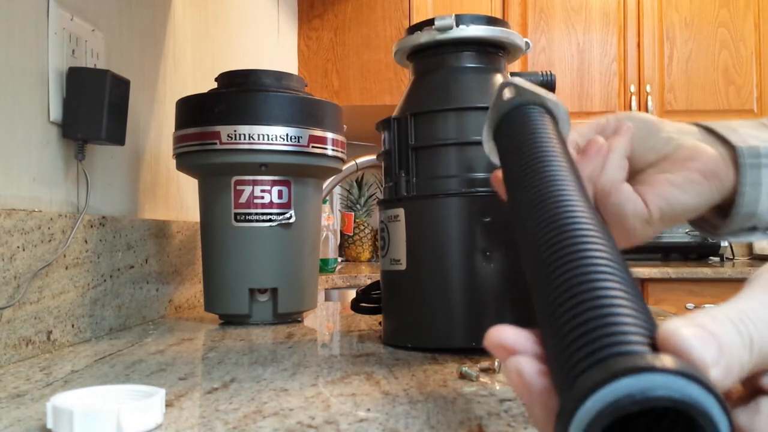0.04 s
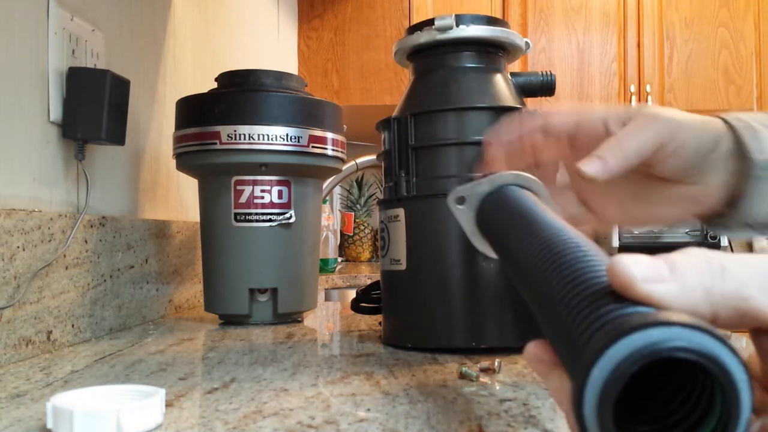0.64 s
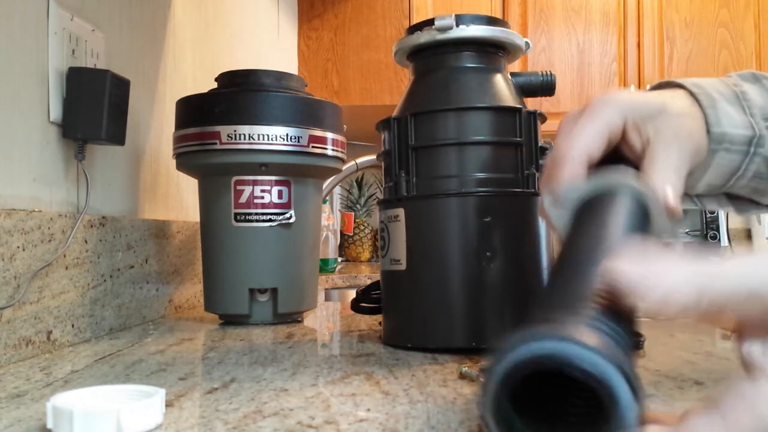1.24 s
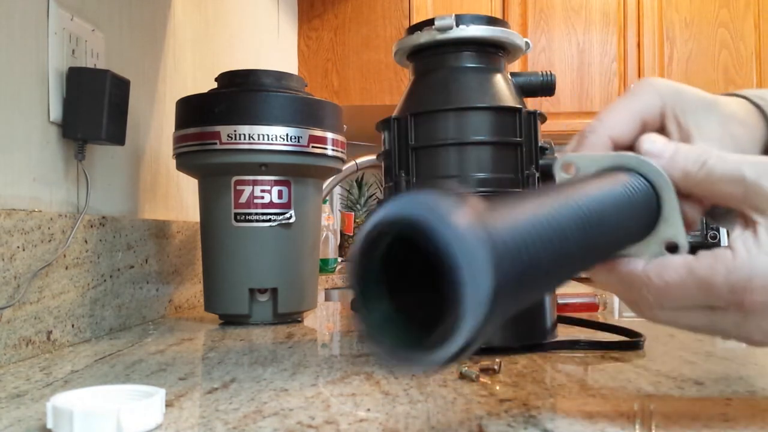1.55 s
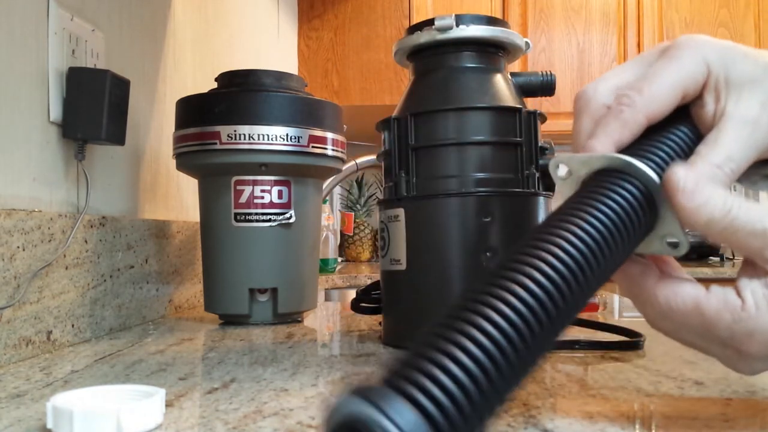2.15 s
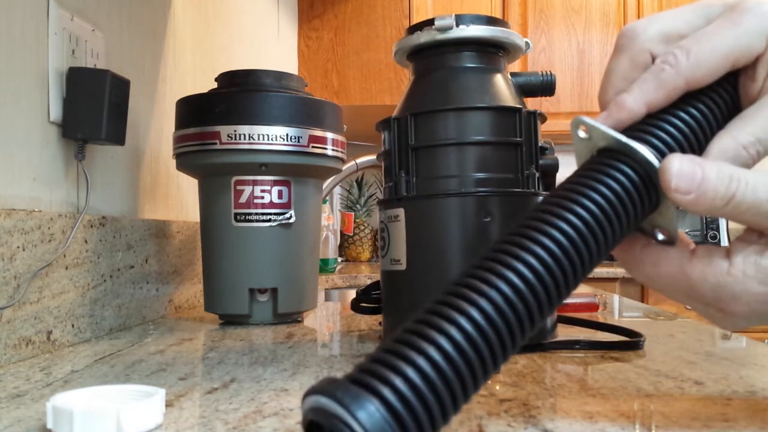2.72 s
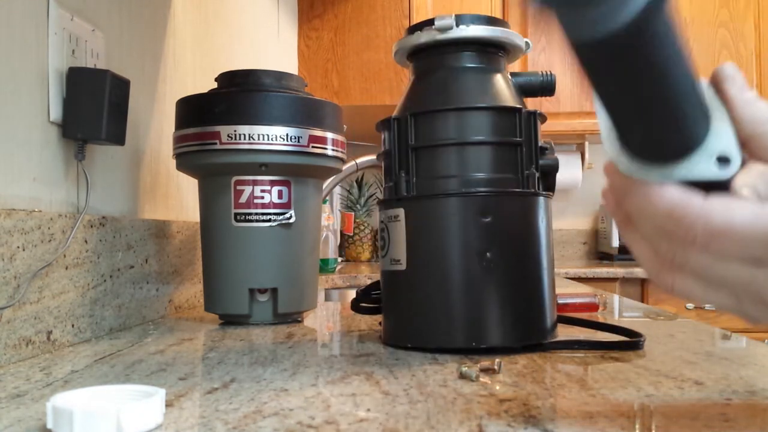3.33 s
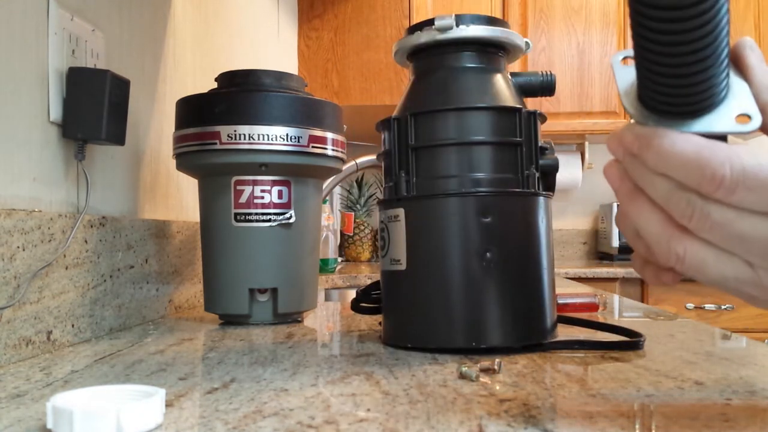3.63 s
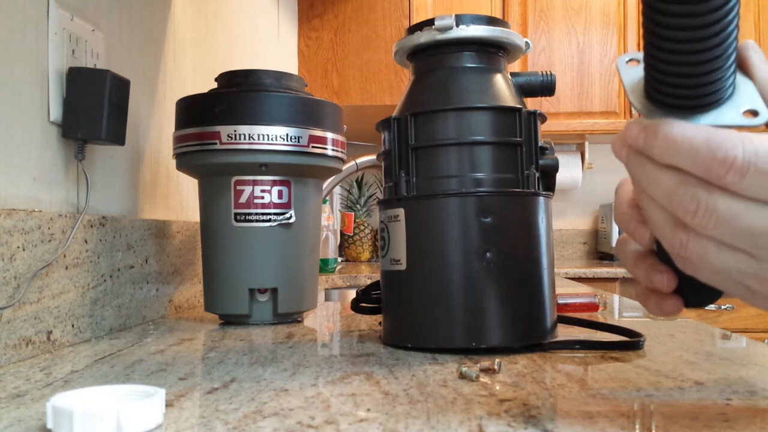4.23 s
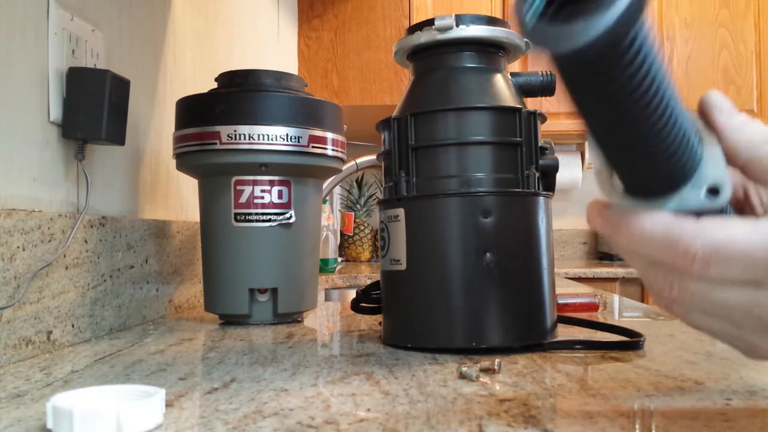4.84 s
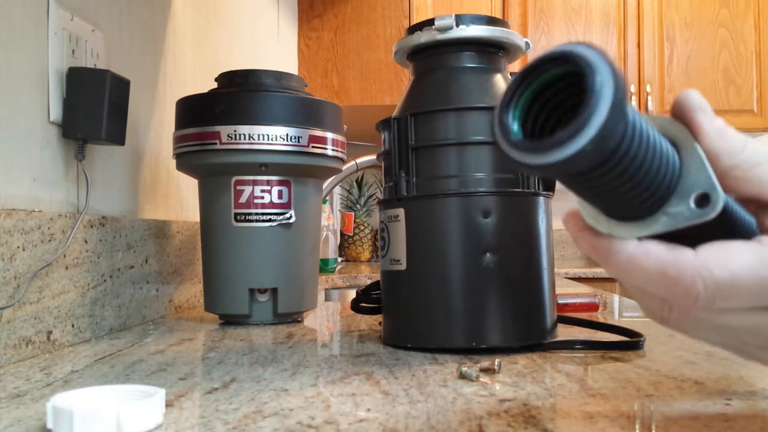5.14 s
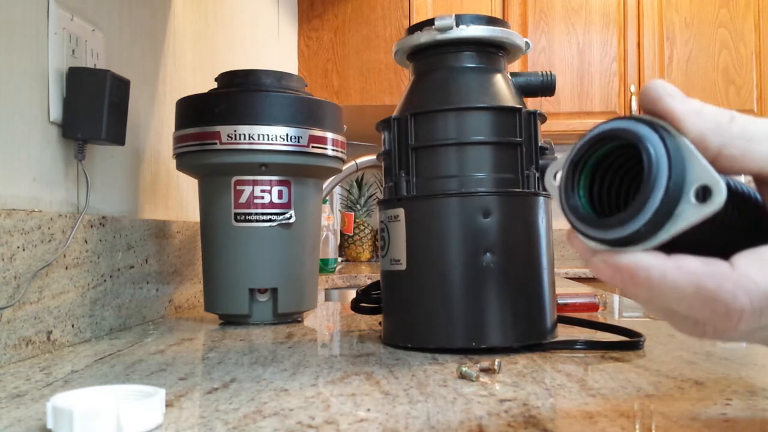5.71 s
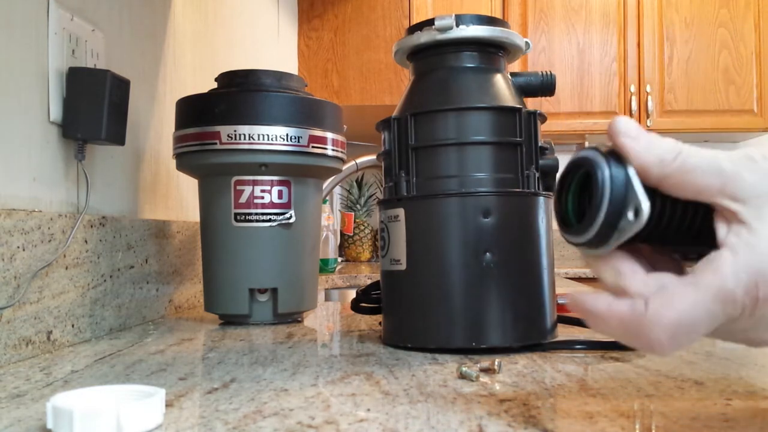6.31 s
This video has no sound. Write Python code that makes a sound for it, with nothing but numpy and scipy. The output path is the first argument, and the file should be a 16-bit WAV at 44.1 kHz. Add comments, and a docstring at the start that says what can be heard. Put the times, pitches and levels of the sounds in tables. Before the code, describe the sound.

Close, zipping runs of plastic clicks and a hollow tube tone as a corrugated hose is worked through a metal ring.

```python
"""A corrugated plastic drain hose ratchets through a metal flange, over a kitchen counter.
Each rib snaps past the flange: the wall cracks and thuds, the air inside rings with a hollow note.
Between pulls, fingers tap and rub the plastic and a palm cups the open end.
A small kitchen reverberates over a faint appliance hum."""
import sys
import numpy as np
from scipy import signal
from scipy.fft import rfft, irfft, next_fast_len
from scipy.io import wavfile
from scipy.ndimage import map_coordinates

SR = 44100
rng = np.random.default_rng(int(sys.argv[2]) if len(sys.argv) > 2 else 0)


def dump_mix(stems):
    """Bounce the given channels to the path in sys.argv[1] as a 16-bit WAV at rate SR."""
    frames = np.atleast_2d(stems).T  # one column per channel
    limited = np.clip(frames, -1, 1)  # hard clip at full scale
    pcm = np.round(limited * 32767).astype(np.int16)
    wavfile.write(sys.argv[1], SR, pcm)


N = 289737
TIME_S = np.arange(N) / SR

# ribs passing the flange: start_s, peak_db, jolt_db
RIB_SNAPS = [(0.1, -20, -35), (0.1436, -17.5, -29), (0.1627, -14, -35.5), (0.183, -16.5, -34.5),
             (0.195, -13.5, -26), (0.2036, -10.5, -50), (0.415, -16, -35), (0.4384, -22, -36.5),
             (0.9551, -17.5, -38.5), (0.9865, -18.5, -31), (1.021, -19, -44), (1.0275, -14, -28.5),
             (1.048, -11, -25.5), (1.0835, -9, -26), (1.1272, -21, -40), (3.18, -16.5, -35),
             (3.2021, -15.5, -37), (3.2135, -22, -34.5), (3.236, -19, -34), (3.25, -13.5, -31.5),
             (3.2645, -17, -36), (3.2812, -11, -32.5), (3.3059, -24, -37), (3.3303, -13, -31),
             (3.3679, -13.5, -32), (3.3906, -16.5, -37), (3.413, -18.5, -31), (3.462, -11.5, -32.5),
             (3.4723, -29, -35), (3.5125, -19, -31.5), (3.5316, -18, -36.5), (5.033, -19, -36),
             (5.0729, -8.5, -28), (5.1027, -9.5, -30.5), (5.1224, -8.5, -28.5), (5.1304, -9.5, -22.5),
             (5.1539, -17.5, -25.5), (5.168, -5, -23.5), (5.1875, -11, -26), (5.2016, -7.5, -29),
             (5.2268, -9, -21.5), (5.2439, -17, -27), (5.2582, -10.5, -35), (5.2969, -8.5, -24.5),
             (5.3058, -9, -33.5), (5.3215, -5.5, -26), (5.3409, -11, -34.5), (5.3568, -5, -25),
             (5.3731, -6.5, -34), (5.3905, -4.5, -35.5), (5.4026, -7, -30), (5.4235, -7.5, -35),
             (5.4342, -4.5, -39.5), (5.4529, -7, -30)]
# fingers and loose flange: start_s, peak_db, jolt_db, note_db
LIGHT_TAPS = [(1.289, -29, -47.5, -54), (1.6088, -44, -58.5, -46.5), (1.6372, -43, -59.5, -39.5),
              (1.784, -44, -70, -76), (1.8634, -34.5, -48, -36.5), (1.9073, -41, -58, -67),
              (2.0015, -48, -61.5, -51), (2.4525, -59, -61.5, -60), (2.496, -31, -48.5, -61),
              (2.8811, -51, -53.5, -68), (2.9086, -32, -48.5, -36.5), (3.145, -30, -43.5, -36),
              (3.7927, -40, -57.5, -49), (3.902, -45.5, -61, -52.5), (4.5284, -53, -64, -52),
              (4.9718, -39.5, -52, -41), (5.011, -29.5, -45, -41), (6.0103, -45.5, -67.5, -69)]
# grip per pull: start_s, end_s, crack_db, sparkle_db, thump_db, thud_db, free_ring_db, drag_db
PULL_GRIPS = [(0.09, 0.25, -1.5, 0, -8, -2.5, -4, -26), (0.41, 0.43, 1.5, 3.5, -5.5, 3.5, -4, -42),
              (0.94, 1.148, 1, 4.5, -12.5, -8.5, -4.5, -26.5), (3.17, 3.421, 2.5, 1, -15, -1, 4, -38.5),
              (3.45, 3.56, 4.5, 0, -5.5, 2.5, -0.5, -38.5), (5.02, 5.26, 0, -0.5, -28, -1.5, -7, -33),
              (5.29, 5.47, -0.5, -1, -13.5, -2, -19, -33.5)]


def from_db(db):
    return 10 ** (np.asarray(db) / 20)


def unit_energy(x):
    return x / np.sqrt(np.sum(x ** 2, axis=-1, keepdims=True) + 1e-20)


def decay(t, t60_s):
    return np.exp(-np.log(1000) * t / t60_s)


def swell(centre_s, sigma_s):
    return np.exp(-((TIME_S - centre_s) / sigma_s) ** 2 / 2)


def add(track, start_s, sound):
    i = max(int(round(start_s * SR)), 0)
    track[..., i:i + sound.shape[-1]] += sound[..., :N - i]


def at_hz(points, hz):
    """Table lookup on a log-frequency axis."""
    freq_hz, value = np.transpose(points)
    return np.interp(np.log(np.maximum(hz, 1)), np.log(freq_hz), value)


def coloured(x, spectrum, size=4096):
    """Unit-energy minimum-phase filter, falling away past both ends of the spectrum."""
    (low_hz, low_db), (high_hz, high_db) = spectrum[0], spectrum[-1]
    closed = [(low_hz / 2, low_db - 30), *spectrum, (high_hz * 2, high_db - 30)]
    gain = from_db(at_hz(closed, np.fft.rfftfreq(size, 1 / SR)))
    cepstrum = irfft(np.log(gain))
    cepstrum[1:size // 2] *= 2
    cepstrum[size // 2 + 1:] = 0
    impulse = unit_energy(irfft(np.exp(rfft(cepstrum))))
    return signal.oaconvolve(x, impulse[None], axes=1)[:, :N]


def stereo_noise(corr, size):
    """White noise with left-right correlation corr."""
    mid, side = rng.standard_normal((2, size))
    return np.sqrt((1 + corr) / 2) * mid + np.sqrt((1 - corr) / 2) * side * np.array([[1], [-1]])


def waver(rate_hz):
    """Smooth random wander, spread about 1."""
    steps = rng.standard_normal(N // 100)
    return map_coordinates(steps, [TIME_S * rate_hz], order=3, mode="mirror")


def background(air_db=-62):
    """Still room air and appliance hum."""
    # room air: freq_hz, gain_db
    air_spectrum = [(15, -56.5), (25, -26.5), (49, -4.5), (71, -9.5), (81, -19), (100, -6), (166, -5),
                    (314, -7), (340, -6), (455, -5.5), (563, -17), (735, -17.5), (2310, -27), (2640, -25.5),
                    (14500, -30)]
    # hum: pitch_hz, level_db
    hum_tones = [(167.7, -70), (480, -72.5), (62.3, -72)]
    hum = sum(from_db(db) * np.sin(2 * np.pi * (hz * TIME_S + rng.random())) for hz, db in hum_tones)
    return from_db(air_db) * coloured(stereo_noise(0.14, N), air_spectrum) + hum


def kitchen(build_s, bass_hz):
    """Impulse response of counter and cupboards: dies band by band, bass alike on both sides."""
    # reverberation: freq_hz, t60_s
    band_decay = [(150, 0.44), (500, 0.31), (1500, 0.35), (4000, 0.33), (8000, 0.36), (14000, 0.22)]
    # reflections: freq_hz, gain_db
    band_gain = [(150, 0.5), (500, 1.5), (1500, 2.5), (4000, -1.5), (8000, -3), (14000, -0.5)]
    t, tail = TIME_S[:int(.7 * SR)], 0
    edges_hz = np.geomspace(60, 16000, 9)
    for low, high in zip(edges_hz, edges_hz[1:]):
        hz = np.sqrt(low * high)
        band = signal.butter(3, [low, high], "band", fs=SR, output="sos")
        corr = 1 / (1 + (hz / bass_hz) ** 2)
        noise = from_db(at_hz(band_gain, hz)) * stereo_noise(corr, len(t))
        tail = tail + signal.sosfilt(band, noise) * decay(t, at_hz(band_decay, hz))
    return unit_energy(tail * (1 - np.exp(-(t / build_s) ** 2)))


def microphone_ports(x):
    """Two ports colour left and right oppositely."""
    # port balance: freq_hz, left_minus_right_db
    balance = [(80, -5), (200, 0.5), (400, 0), (800, -3.5), (1400, 4), (2800, .5), (3800, -2), (5300, 4.5),
               (6800, -2.5), (8500, -5), (11000, -11), (14000, -7.5)]
    size = next_fast_len(2 * N)
    half_db = at_hz(balance, np.fft.rfftfreq(size, 1 / SR)) / 2
    return irfft(rfft(x, size) * from_db([half_db, -half_db]), size)[:, :N]


def friction(strokes, spectrum, grain_db, grain_hz, corr):
    """Sliding contact: tiny uneven slips swell and fade with each stroke."""
    envelope = sum(from_db(db) * swell(centre_s, sigma_s) for centre_s, sigma_s, db in strokes)
    sizes = from_db(grain_db * np.clip(rng.standard_normal(N // 4), -2, 2))
    sizes /= np.sqrt(np.mean(sizes ** 2))
    grain = np.interp(TIME_S * grain_hz, np.arange(len(sizes)), sizes)
    return coloured(stereo_noise(corr, N) * grain * envelope, spectrum)


def finger_rubs():
    """Skin slides on the hose."""
    # rubs: centre_s, sigma_s, level_db
    strokes = [(0.0, 0.032, -48), (0.49, 0.066, -54.5), (0.592, 0.0066, -49), (0.80, 0.023, -59),
               (0.945, 0.032, -51.5), (1.17, .035, -56), (1.28, 0.022, -51), (2.53, 0.041, -65.5),
               (2.88, 0.024, -59.5), (5.42, 0.024, -27.5), (6.02, 0.052, -62), (6.265, 0.031, -54.5),
               (6.33, 0.056, -58)]
    # skin friction: freq_hz, gain_db
    spectrum = [(150, 2.5), (480, 9.5), (900, -2.5), (2000, -4.5), (3500, -0.5), (7000, 1.5), (10000, -6),
                (14500, -13.5)]
    return friction(strokes, spectrum, grain_db=2.5, grain_hz=530, corr=0.14)


def bursts(times_s, levels_db, spectrum, t60_s, corr, spike, rattle_db, rattle_t60_s):
    """A faint hiss leads into each click: a spike, a scatter along the ribs, then a weak rattle."""
    out, onset = np.zeros((2, N)), SR // 100
    t = TIME_S[:SR // 10] - onset / SR
    lead_in = from_db(-22) * decay(abs(t), t60_s=0.081)
    release = decay(abs(t), t60_s) + from_db(rattle_db) * decay(abs(t), rattle_t60_s)
    envelope = np.where(t < 0, lead_in, release)
    for start_s, db in zip(times_s, levels_db):
        burst = unit_energy(stereo_noise(corr, len(t)) * envelope)
        lag = int(round(rng.normal(0, 4)))   # each spot has its own path to each side
        burst[[0, 1], [onset, onset + lag]] += spike
        add(out, start_s + t[0], from_db(db) * unit_energy(burst) * np.linalg.norm(envelope))
    return coloured(out, spectrum)


def snaps(times_s, peak_db, jolt_db, crack_db, tick_db, sparkle_db, thump_db, thud_db, knock_db):
    """Contacts on the hose: three bright parts follow the peak, three low ones the jolt to the wall."""
    # spectra of the six parts: freq_hz, gain_db
    crack = [(900, -34.5), (1350, -8.5), (1650, -10), (1900, -4), (2300, -5), (2700, -1.5), (2980, -6),
             (3180, 1.5), (3450, 2.5), (3750, -3), (4300, -4), (4900, -13.5), (6500, -19)]
    tick = [(3500, -28.5), (4800, -5), (5400, 3), (5750, 6), (6300, 4), (7000, -2), (8000, -7), (9500, -20)]
    sparkle = [(6500, -28), (8200, 5), (9800, 4.5), (11200, -4), (12500, -8.5), (14500, -7)]
    thump = [(45, -30.5), (65, -18), (90, -11.5), (120, -0.5), (146, 0), (185, -7), (280, -29.5)]
    thud = [(140, -19.5), (200, -2.5), (235, -6), (290, -0.5), (325, -10.5), (380, -0.5), (450, 5),
            (700, -39)]
    knock = [(350, -26.5), (540, 2.5), (800, 1.5), (1000, -1.5), (1300, -9.5), (1700, -14), (2600, -7)]
    out = bursts(times_s, peak_db + crack_db, crack,
                 t60_s=0.022, corr=0.028, spike=0.11, rattle_db=-26, rattle_t60_s=0.073)
    out += bursts(times_s, peak_db + tick_db, tick,
                  t60_s=0.028, corr=0.18, spike=0.55, rattle_db=-20.5, rattle_t60_s=0.06)
    out += bursts(times_s, peak_db + sparkle_db, sparkle,
                  t60_s=0.029, corr=0.05, spike=0.49, rattle_db=-26, rattle_t60_s=0.048)
    out += bursts(times_s, jolt_db + thump_db, thump,
                  t60_s=0.043, corr=0.85, spike=0.46, rattle_db=-13, rattle_t60_s=0.061)
    out += bursts(times_s, jolt_db + thud_db, thud,
                  t60_s=0.025, corr=0.92, spike=0.53, rattle_db=-17.5, rattle_t60_s=0.019)
    out += bursts(times_s, jolt_db + knock_db, knock,
                  t60_s=0.014, corr=0.072, spike=0.5, rattle_db=-16.5, rattle_t60_s=0.14)
    return out


def wall_ring(times_s, levels_db, overtones_db, t60_cycles):
    """The wall beyond the flange rings and stirs the overtones of the air column."""
    # wall pitch, higher with the flange near the stiff cuff: time_s, pitch_hz
    wall_pitch = [(1.1, 700), (1.8, 970), (2.5, 964), (2.9, 555), (3.25, 796), (3.55, 748), (5.12, 560),
                  (5.24, 870), (5.30, 1020), (5.37, 1680)]
    # air overtones: pitch_hz, gain_db, t60_s
    air_modes = [(979, -8.5, 0.034), (1483, -13.5, 0.073)]
    out, t = np.zeros(N), TIME_S[:SR // 6]
    air = sum(from_db(db) * np.sin(2 * np.pi * hz * t) * decay(t, t60_s) for hz, db, t60_s in air_modes)
    for start_s, db, overtone_db in np.broadcast(times_s, levels_db, overtones_db):
        hz = np.interp(start_s, *np.transpose(wall_pitch))
        wall = np.sin(2 * np.pi * hz * t) * decay(t, t60_cycles / hz)
        add(out, start_s, from_db(db) * (wall + from_db(overtone_db) * air))
    return out


def taps(ring_db=5):
    """Light contacts leave the wall free to ring longer."""
    times_s, peak_db, jolt_db, _ = np.transpose(LIGHT_TAPS)
    out = snaps(times_s, peak_db, jolt_db, crack_db=-6, tick_db=-10, sparkle_db=-18,
                thump_db=-1.5, thud_db=7.5, knock_db=7.5)
    return out + wall_ring(times_s, jolt_db + ring_db, overtones_db=-5, t60_cycles=27)


def tap_envelope(times_s, levels_db, rise_s=0.0026, t60_s=0.075):
    """Jolted air builds over a few round trips; the hand damps it."""
    power, t = np.zeros(N), TIME_S[:SR // 3]
    pulse = (1 - np.exp(-t / rise_s)) * decay(t, t60_s)
    for start_s, db in zip(times_s, levels_db):
        add(power, start_s, (from_db(db) * pulse) ** 2)
    return np.sqrt(power)


def pull_envelope(curve, attack_t60_s=0.0084, release_t60_s=0.043):
    """Level curve with an attack before it and a release after it."""
    times_s, levels_db = np.transpose(curve)
    attack = decay(np.maximum(times_s[0] - TIME_S, 0), attack_t60_s)
    release = decay(np.maximum(TIME_S - times_s[-1], 0), release_t60_s)
    return from_db(np.interp(TIME_S, times_s, levels_db)) * attack * release


def air_column(envelope, waver_hz, side_rad=0.05):
    """One wavering note; the two open ends arrive slightly out of phase."""
    # note as hands bend and shade the hose: time_s, pitch_hz
    air_pitch = [(0.1, 495), (0.45, 498), (1.0, 492), (1.2, 490), (1.29, 469), (1.68, 466), (1.87, 492),
                 (2.5, 450), (2.9, 500), (3.3, 488), (5.13, 478), (5.24, 484), (5.37, 488), (5.47, 474)]
    hz = np.interp(TIME_S, *np.transpose(air_pitch)) + waver_hz * waver(rate_hz=70)
    phase = 2 * np.pi * np.cumsum(hz) / SR
    return envelope * np.sin(phase + side_rad * np.array([[-1], [1]]))


def hollow_note(pull_db=-1, tap_db=2, flutter_db=1.8):
    """Ribs, taps and palm excite the air in the hose; ribs out of step make it flutter."""
    # note level, one curve per run of ribs: time_s, level_db
    pull_curves = [
        [(0.095, -40), (0.107, -29.5), (0.133, -35), (0.197, -27.5), (0.253, -32.5), (0.28, -49)],
        [(0.412, -50), (0.424, -28.5), (0.452, -59), (0.47, -39.5)],
        [(0.95, -47), (0.966, -35.5), (1.022, -41.5), (1.042, -24.5), (1.056, -20), (1.098, -31.5),
         (1.146, -32), (1.18, -49)],
        [(3.18, -44), (3.208, -31), (3.294, -45), (3.326, -34), (3.362, -66), (3.402, -34.5), (3.546, -50),
         (3.58, -41)],
        [(5.02, -47), (5.03, -35), (5.14, -17), (5.21, -33), (5.232, -21), (5.246, -16), (5.29, -48)],
        [(5.29, -33), (5.328, -47), (5.35, -22), (5.472, -28.5), (5.5, -56)],
    ]
    # palm cupping the open end: centre_s, level_db
    palm_boops = [(1.309, -30.5), (1.652, -42)]
    taps_s, *_, note_db = np.transpose(LIGHT_TAPS)
    pulled = np.max([pull_envelope(curve) for curve in pull_curves], axis=0)
    pulled *= from_db(pull_db + flutter_db * waver(rate_hz=90))
    cupped = sum(from_db(db) * swell(centre_s, sigma_s=0.012) for centre_s, db in palm_boops)
    touched = np.hypot(tap_envelope(taps_s, note_db + tap_db), cupped)
    return air_column(pulled, waver_hz=14) + air_column(touched, waver_hz=4.6)


def grip(times_s):
    """The six dB columns of the pull nearest each time."""
    pulls = np.array(PULL_GRIPS)
    pauses_s = (pulls[:-1, 1] + pulls[1:, 0]) / 2
    return pulls[np.searchsorted(pauses_s, times_s), 2:].T


def flange_drag(lag_s=0.004, sigma_s=0.015):
    """The flange scrapes the plastic, swelling around each snap."""
    # scrape: freq_hz, gain_db
    spectrum = [(100, -9), (140, 1), (300, 2.5), (420, -4), (485, 11), (560, 6), (1200, -5), (2200, 2.5),
                (3400, -1), (4700, 3), (5800, -2.5), (7500, -8.5), (10000, -22.5), (14500, -25)]
    times_s, peak_db, _ = np.transpose(RIB_SNAPS)
    *_, drag_db = grip(times_s)
    strokes = np.broadcast(times_s + lag_s, sigma_s, peak_db + drag_db)
    return friction(strokes, spectrum, grain_db=2, grain_hz=1200, corr=0.061)


def slips(rate_hz=17, mean_db=-18, spread_db=1):
    """Weak random slips of the flange during pulls; rows of start_s, peak_db, jolt_db."""
    ribs_s, peak_db, jolt_db = np.transpose(RIB_SNAPS)
    times_s = np.flatnonzero(rng.random(N) < rate_hz / SR) / SR
    in_pull = [(times_s > start_s) & (times_s < end_s) for start_s, end_s, *_ in PULL_GRIPS]
    times_s = times_s[np.any(in_pull, axis=0)]
    offset_db = mean_db - spread_db * rng.standard_normal(N)[(times_s * SR).astype(int)]
    return np.column_stack([times_s, np.interp(times_s, ribs_s, peak_db) + offset_db,
                            np.interp(times_s, ribs_s, jolt_db) + offset_db])


def rib_ring(times_s, levels_db, detune=0.03):
    """Each rib pings at its own pitch, with its own phase on each side."""
    # one rib: pitch_hz, gain_db, t60_s
    rib_modes = [(2900, -12.5, 0.031), (3630, -8.5, 0.022), (4050, -10, 0.0083)]
    out, t = np.zeros((2, N)), TIME_S[:SR // 20]
    for start_s, level_db in zip(times_s, levels_db):
        for hz, db, t60_s in rib_modes:
            pitch_hz = hz * (1 + detune * rng.standard_normal())
            ping = np.sin(2 * np.pi * pitch_hz * t + rng.standard_normal((2, 1)))
            add(out, start_s, from_db(level_db + db) * ping * decay(t, t60_s))
    return out


def ratchet(contacts, snap_delay_s=0.0007, ping_db=-1, ring_db=4.5, ping_db_per_db=0.47):
    """Ribs snap past the flange; the grip colours the snap and mutes the ringing."""
    times_s, peak_db, jolt_db = np.transpose(contacts)
    crack_db, sparkle_db, thump_db, thud_db, free_ring_db, _ = grip(times_s)
    snap_s = times_s + snap_delay_s
    out = snaps(snap_s, peak_db, jolt_db, crack_db=crack_db - 14.5, tick_db=-11,
                sparkle_db=sparkle_db - 21, thump_db=thump_db, thud_db=thud_db, knock_db=2)
    out += wall_ring(snap_s, jolt_db + ring_db, overtones_db=free_ring_db, t60_cycles=15)
    return out + rib_ring(snap_s, peak_db + ping_db + ping_db_per_db * free_ring_db)


def scene(wet_db=-6.5, note_send_db=-3):
    """The hose close up in the kitchen; its open end beams the note forward, so that stays drier."""
    reflections = kitchen(build_s=0.0024, bass_hz=494)
    ambience = background()
    note = hollow_note()
    wall = taps() + flange_drag() + finger_rubs()
    wall += ratchet(RIB_SNAPS) + ratchet(slips())
    # the hose sounds carry little deep bass below 75 Hz
    wall = signal.sosfilt(signal.butter(3, 75, "high", fs=SR, output="sos"), wall)
    reverb = signal.fftconvolve(wall + from_db(note_send_db) * note, reflections, axes=1)[:, :N]
    return microphone_ports(wall + note + from_db(wet_db) * reverb) + ambience


def record(dry):
    """Steep low-pass."""
    cutoff_hz = 14700
    return signal.sosfilt(signal.ellip(10, .2, 80, cutoff_hz, fs=SR, output="sos"), dry)


dry = scene()
out = record(dry)
dump_mix(out)
```